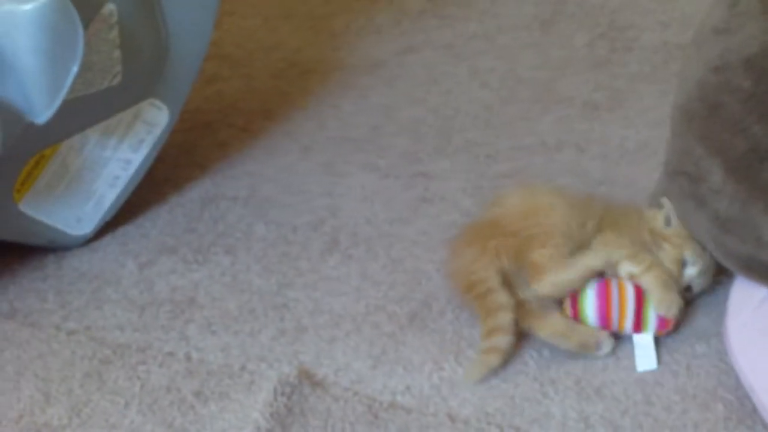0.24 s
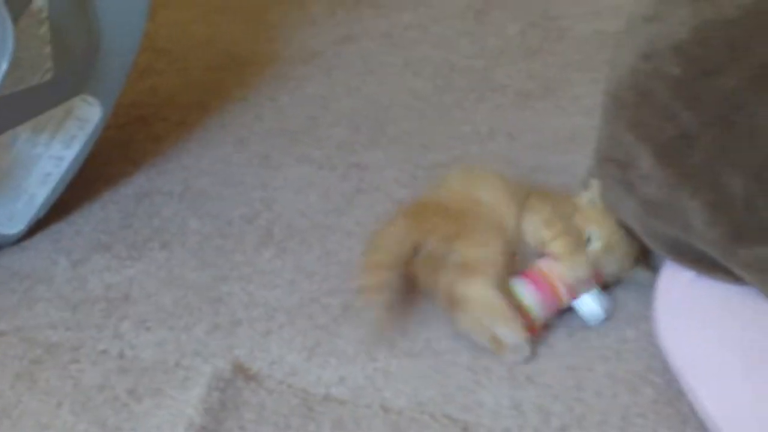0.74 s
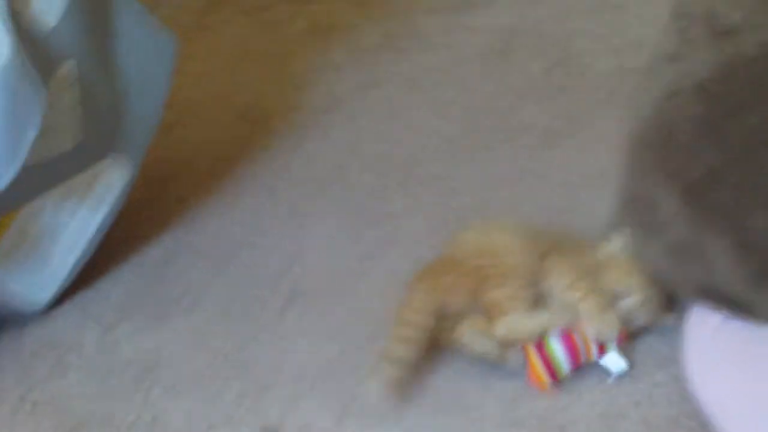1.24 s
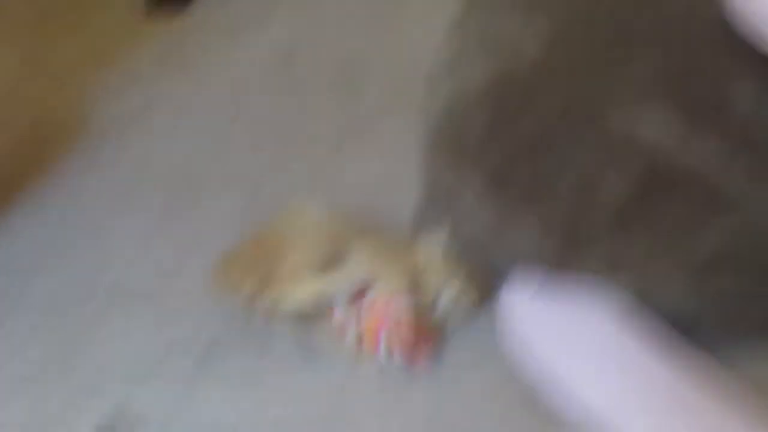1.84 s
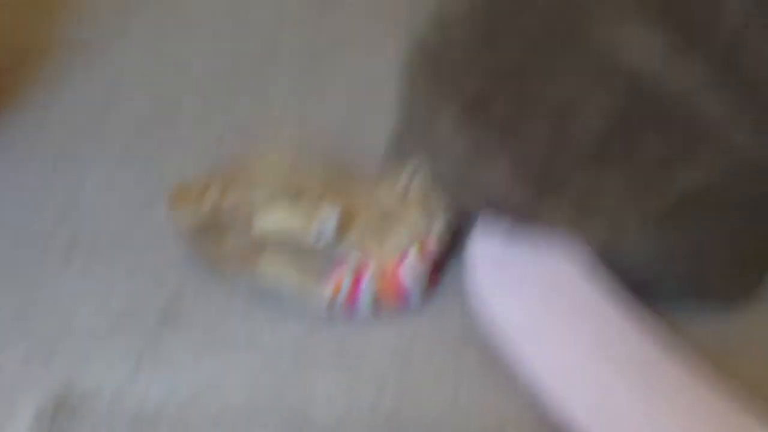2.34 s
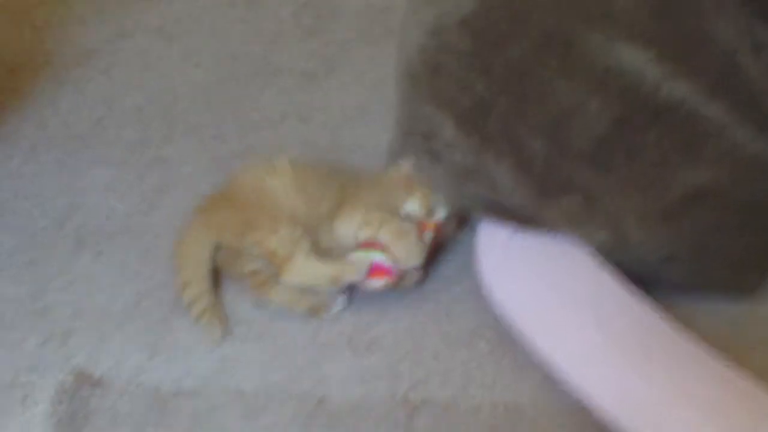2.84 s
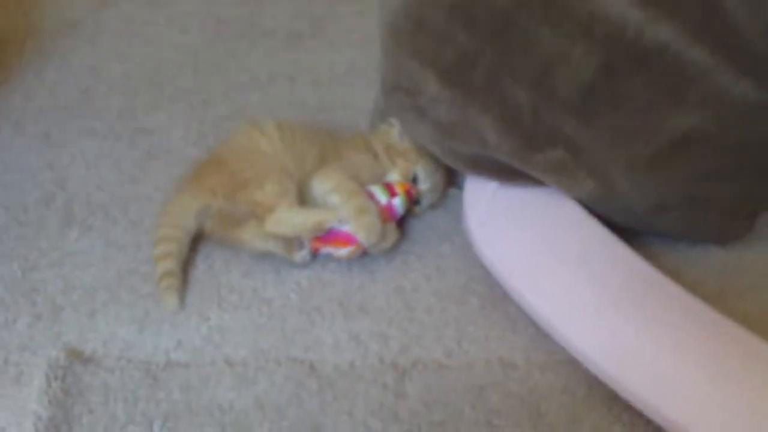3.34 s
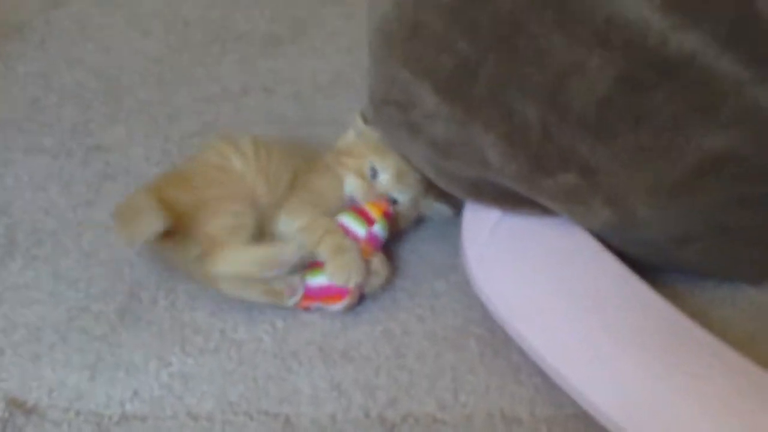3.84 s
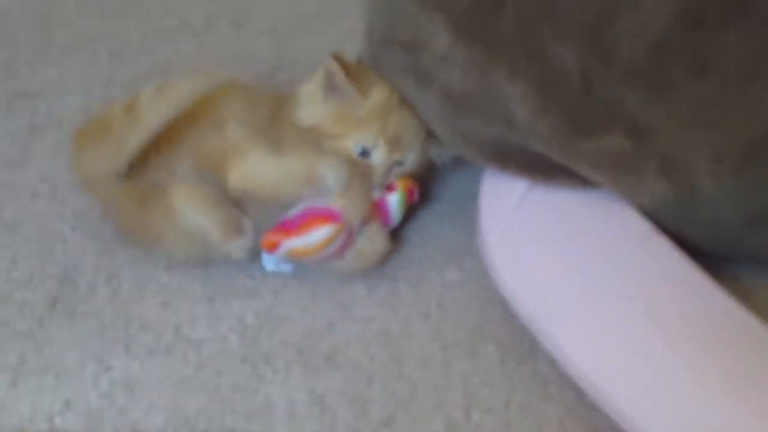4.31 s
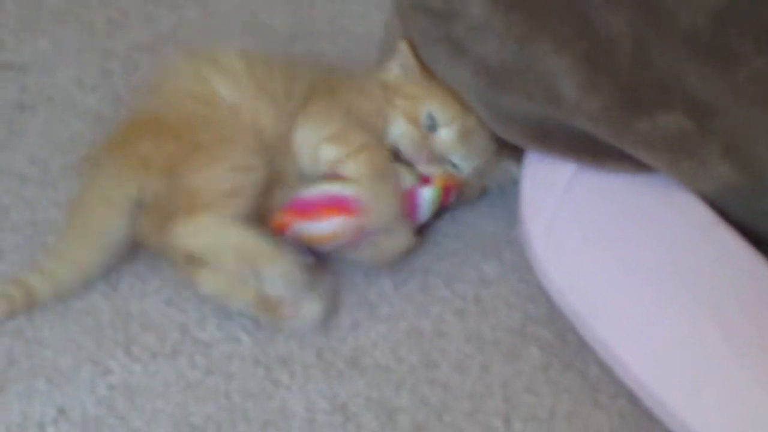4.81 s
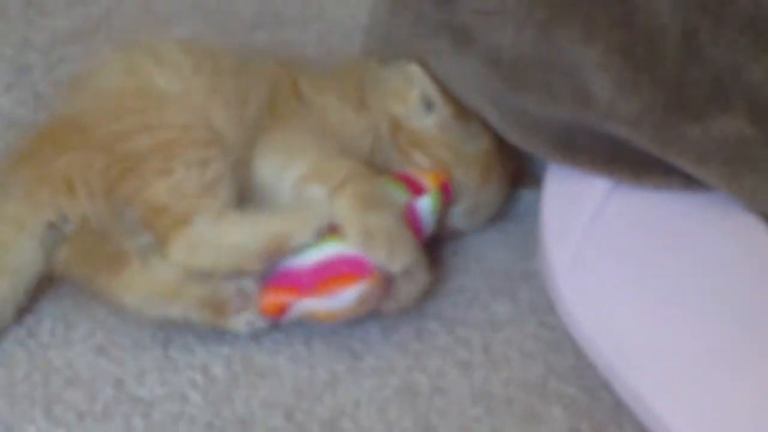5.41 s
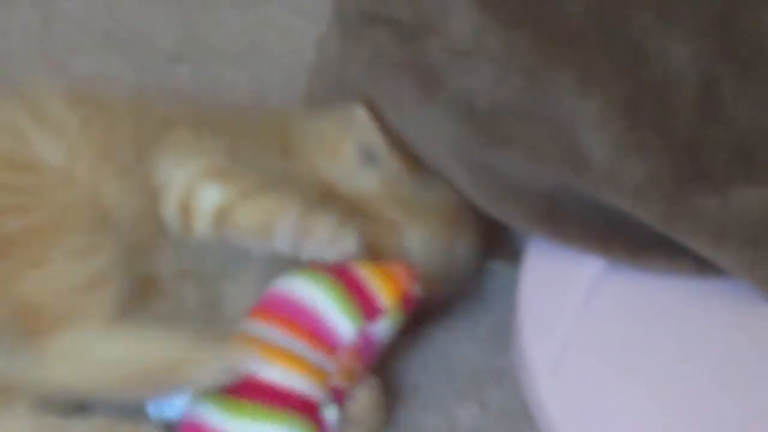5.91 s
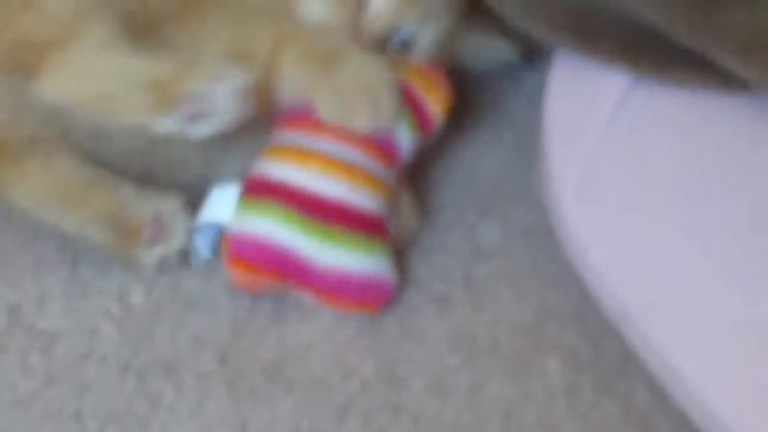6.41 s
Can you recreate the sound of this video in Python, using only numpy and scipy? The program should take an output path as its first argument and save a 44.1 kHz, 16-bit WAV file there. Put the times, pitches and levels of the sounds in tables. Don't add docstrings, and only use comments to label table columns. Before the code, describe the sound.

A kitten wrestles a cloth toy on carpet, but what is heard is the hand-held camera: steady soft hiss, hum and thin electronic whines, early ticks, then short dry finger rubs and creaks on plastic with one violent snap. Later come sparse taps, two bright hard snaps and a final duller double knock, all extremely close to the microphone in a quiet carpeted room.

```python
import sys
import numpy as np
from scipy import signal
from scipy.fft import rfft, irfft
from scipy.io import wavfile
from scipy.ndimage import uniform_filter1d

SR = 44100
rng = np.random.default_rng(int(sys.argv[2]) if len(sys.argv) > 2 else 0)


def gain_from_decibels(decibels):
    exponent = np.asarray(decibels, float) / 20
    return 10 ** exponent


def transcribe(u):
    v = np.clip(np.atleast_2d(u).T, -1, 1)
    q = np.round(v * 32767).astype(np.int16)
    wavfile.write(sys.argv[1], SR, q)


N = 293882


def evened(x):
    return x / np.sqrt(np.mean(x ** 2) + 1e-20)


def peaked(x):
    return x / (abs(x).max() + 1e-12)


def add(mix, start_s, sound):
    part = mix[round(start_s * SR):][:len(sound)]
    part += sound[:len(part)]


def band(x, hz, kind):
    return signal.sosfilt(signal.butter(3, hz, kind, fs=SR, output="sos"), x)


def resonate(x, hz, width_hz):
    return signal.lfilter(*signal.iirpeak(min(hz, .45 * SR), hz / width_hz, fs=SR), x)


def through(x, modes, shift_db=0):
    shift_db = shift_db + np.zeros((len(modes), 1))
    out = 0
    for k, (hz, width_hz, level_db) in enumerate(modes):
        out = out + (-1) ** k * gain_from_decibels(level_db + shift_db[k]) * resonate(x, hz, width_hz)
    return out


def wander(count, size):
    smooth = uniform_filter1d(rng.standard_normal(count), size)
    return evened(uniform_filter1d(smooth, size))


# pitch_hz, density_db (per Hz)
ROOM_SPECTRUM = [(30, -42.5), (100, -31), (150, -34), (229, -18), (291, -12), (388, -8.5), (533, -9),
                 (700, -4.5), (904, -8), (1310, -1.5), (2000, -8), (3480, -11.5), (8000, -15),
                 (15000, -18.5)]
# pitch_hz, width_hz, rise_db
HUMS = [(123, 25, 8), (240, 18, 5), (450, 33, 5), (629, 57, 3), (752, 24, 6.5), (960, 110, 7.5)]


def room():
    frames, hz = N // 512 + 5, np.fft.rfftfreq(2048, 1 / SR)
    real, imaginary, patches = rng.standard_normal((frames, 1025, 3)).T
    patches = uniform_filter1d(patches, size=5, axis=0)
    patches = evened(uniform_filter1d(patches, size=8, axis=1))
    knot_hz, knot_db = np.transpose(ROOM_SPECTRUM)
    colour_db = np.interp(np.log(hz + 1), np.log(knot_hz + 1), knot_db)
    for centre_hz, width_hz, rise_db in HUMS:
        colour_db += rise_db * np.exp(-((hz - centre_hz) / width_hz) ** 2)
    swell_db = .2 * wander(frames, size=20)
    spectra = (real + 1j * imaginary) * gain_from_decibels(colour_db[:, None] + 1.4 * patches + swell_db)
    noise = signal.istft(spectra, nperseg=2048, noverlap=1536)[1][:N]
    return gain_from_decibels(-55) * evened(noise)


# start_s, stop_s, pitch_hz, level_db, waver_hz
WHINES = [
    (0, 6.7, 7881, -83, 6),
    (3.5, 4.3, 11090, -77, 6),
    (4.7, 6.7, 11090, -81, 6),
    (5.2, 5.4, 15046, -68, 3),
]


def whines():
    t, out = np.arange(N) / SR, np.zeros(N)
    for start_s, stop_s, pitch_hz, level_db, waver_hz in WHINES:
        on = np.clip(np.minimum(t - start_s, stop_s - t) / .012, 0, 1)
        phase = 2 * np.pi * np.cumsum(pitch_hz + waver_hz * wander(N, size=2000)) / SR
        out += on * np.sqrt(2) * gain_from_decibels(level_db) * np.sin(phase)
    return out


# land_s, leave_s, first_db, last_db, pad_db (dullness of a flat finger pad)
STROKES = [(0.403, 0.404, -56, -49, -2), (1.212, 1.339, -47.5, -34, 4), (1.338, 1.353, -32.5, -33, 1),
           (1.372, 1.441, -59, -49.5, 6.5), (1.522, 1.578, -58, -52.5, 5), (1.694, 1.83, -49.5, -46.5, 3),
           (1.833, 1.968, -48.5, -51, 5), (1.952, 2.076, -43.5, -55, -6.5), (2.084, 2.183, -47, -39.5, 4),
           (2.188, 2.232, -37, -28.5, -2.5), (2.27, 2.347, -55, -47.5, -6), (2.401, 2.472, -52, -73, -2),
           (2.883, 2.937, -64, -57.5, 4), (2.952, 3.02, -54.5, -68, -5)]


def pressure(t):
    land_db_per_s, lift_db_per_s = 900, 897
    level = np.zeros((4, len(t)))
    for land_s, leave_s, first_db, last_db, pad_db in STROKES:
        progress = np.clip((t - land_s) / (leave_s - land_s), 0, 1)
        rise_db = (last_db - first_db) * progress ** 1.74
        db = first_db + rise_db
        db = db - land_db_per_s * np.maximum(land_s - t, 0) - lift_db_per_s * np.maximum(t - leave_s, 0)
        dull_db = pad_db - 0.12 * rise_db
        parts_db = [0 * t, dull_db, -1.5 + .3 * dull_db, -3.5 + .15 * rise_db]
        level = np.maximum(level, gain_from_decibels(np.maximum(db + parts_db, -200)))
    return level


# pitch_hz, width_hz, level_db
DULL = [(685, 210, -3.5), (1104, 290, 5.5), (1600, 160, 8.5), (2070, 94, 8.5)]
MIDDLE = [(2560, 190, -4.5), (3205, 300, -2), (4140, 470, -13.5)]
BRIGHT = [(4735, 310, 1), (5534, 370, 2.5), (6763, 560, 4), (8290, 1160, 0.5), (9250, 337, 0.5)]
TOP = [(10550, 2500, -3), (11960, 1100, -19), (13000, 1200, -11.5), (15400, 1400, -22.5)]


def strokes():
    grip_db = 0.62 * wander(N, size=40) + 0.94 * wander(N, size=300)
    catches_per_s = 500
    catches = gain_from_decibels(5.0 * np.minimum(rng.exponential(1, N), 3.6)) * (rng.random(N) < catches_per_s / SR)
    grains = rng.standard_normal(N) * (gain_from_decibels(grip_db) + 0.98 * catches)
    level = pressure(np.arange(N) / SR)
    parts = []
    for modes in (BRIGHT, DULL, MIDDLE, TOP):
        place_db = 2.4 * np.array([wander(N, size=1100) for _ in modes])
        parts.append(evened(through(grains, modes, place_db)))
    return band((level * parts).sum(axis=0), 340, "high")


# start_s, knock_db (peak), pitch_hz, bright_db (peak), slip_ms
CRACKS = [(0.3597, -23, 1600, -39, 2), (0.435, -28.5, 1270, -33, 1.3), (1.3348, -21.5, 1080, -28, 0.92),
          (1.4712, 1, 657, -4.5, 1.8), (1.8339, -19, 1300, -38, 4.3), (1.8375, -8, 848, -12, 1.9),
          (1.8454, -11.5, 1240, -39, 0.3), (2.2272, -24.5, 2060, -16, 2), (2.6781, -29, 1530, -47, 3.3),
          (2.6827, -22.5, 1620, -25.5, 2.3), (3.2215, -24, 1670, -20, 2.2), (3.3234, -13.5, 1130, 2.5, 1.1),
          (4.3317, -25, 720, -23, 1.2), (4.3355, -24.5, 1380, -39, 2), (4.5436, -11, 1890, 1, 1.27),
          (5.6346, -15, 1040, -19, 0.93), (5.6576, -5.5, 1645, -18.5, 1.04)]
# start_s, knock_db (peak), pitch_hz
CREAKS = [(1.2322, -27.5, 840), (1.3951, -30.5, 1560), (1.407, -35, 865), (1.4175, -28.5, 930),
          (1.5256, -42, 1150), (1.541, -37.5, 1150), (1.568, -38, 1340), (1.8263, -18, 840),
          (1.8623, -32, 1560), (1.8755, -25.5, 1810), (1.888, -33.5, 810), (1.8977, -30.5, 860),
          (2.0838, -50.5, 314), (2.2984, -26.5, 880), (2.317, -30, 1570), (2.4, -31, 1900),
          (2.4092, -32, 850), (2.431, -41, 1370)]
# start_s, knock_db (peak), pitch_hz, crack_db (relative to the knock)
TAPS = [(0.4101, -31, 1240, -4), (0.5244, -49.5, 450, 4), (0.5297, -31, 1230, -9), (0.9899, -49, 450, 0),
        (1.04, -38.5, 746, -10), (1.689, -38, 736, 0), (2.926, -39, 1730, 0), (2.9526, -25.5, 1110, -16),
        (3.1993, -32.5, 950, -5), (3.232, -31, 740, -28), (3.2508, -28, 1750, -22),
        (3.5709, -30, 1450, -20), (3.7025, -41, 1400, -6), (4.089, -26, 1800, -22),
        (5.7388, -41, 1330, 0.5), (5.8303, -27, 1920, -17)]


def joints():
    tick_ms = 1.62
    events = [*CRACKS]
    for start_s, knock_db, pitch_hz in CREAKS:
        events.append((start_s, knock_db, pitch_hz, -17.5 + 0.74 * knock_db, tick_ms))
    for start_s, knock_db, pitch_hz, crack_db in TAPS:
        events.append((start_s, knock_db, pitch_hz, knock_db + crack_db, tick_ms))
    rows = []
    for start_s, knock_db, pitch_hz, bright_db, slip_ms in sorted(events):
        from_knock_db = knock_db - 9.5 + 7.5 * np.log2(pitch_hz / 1600)
        middle_db = max(from_knock_db, bright_db - 7)
        rows.append((start_s, knock_db, pitch_hz, middle_db, bright_db, slip_ms))
    return rows


# pitch_hz, level_db, t60_s
RING = [(1158, -3.5, 0.039), (1303, 1.5, 0.024), (1750, 0, 0.028), (692, -10.5, 0.039), (2254, 2.5, 0.012),
        (2930, -12, 0.015), (5200, -38.5, 0.1), (6000, -22, 0.06), (6980, -2, 0.028), (6600, -26, 0.18),
        (10900, -87, 0.05)]


def snap(row, chance):
    start_s, knock_db, pitch_hz, middle_db, bright_db, slip_ms = row
    t = np.arange(len(chance)) / SR
    run = 1000 * t / max(slip_ms, .2)
    onset = np.clip(t / 0.000084, 0, 1)
    slips = chance * onset * (np.exp(-run ** 2) + gain_from_decibels(5) * np.exp(-run / 0.98))
    spectrum = rfft(slips)
    slips = irfft(spectrum / np.sqrt(uniform_filter1d(abs(spectrum) ** 2, size=60)))
    slips *= np.exp(-run / 3.2)

    blow = np.exp(-t / 0.00026) + 0.12 * peaked(slips)
    knock = peaked(resonate(blow, pitch_hz, pitch_hz / 6.1))
    body_share = np.clip((knock_db + 48) / 30, .3, 1.2) * min(pitch_hz / 1000, 1) ** 3
    shell = band(knock + body_share * peaked(through(slips, DULL)), 2300, "low")
    shell = gain_from_decibels(knock_db) * peaked(band(shell, min(0.49 * pitch_hz, 500), "high"))

    top_db = bright_db - 5.5 + 0.086 * (bright_db - knock_db)
    crack = 0
    for level_db, modes in ((middle_db, MIDDLE), (bright_db, BRIGHT), (top_db, TOP)):
        crack = crack + gain_from_decibels(level_db) * peaked(through(slips, modes))

    for k, (ring_hz, level_db, t60_s) in enumerate(RING):
        settling = np.roll(chance, -300 * k) * np.exp(-t / 0.0037)
        drive_db = bright_db - 26
        if ring_hz < 2500:
            drive_db = max(drive_db, knock_db - 21.5 + 14 * np.log2(min(pitch_hz / 1100, 1)))
        ring = resonate(settling, ring_hz, np.log(1000) / np.pi / t60_s)
        shell += gain_from_decibels(drive_db + level_db) * peaked(resonate(ring, ring_hz, 430))

    push = gain_from_decibels(0.67 * bright_db + .5 * knock_db - 29) * np.sin(np.pi * np.clip(t / 0.0014, 0, 1)) ** 2
    return start_s - .0003, shell + push + band(crack, 1100, "high")


def gate_treble(x):
    edge_hz = 15400
    hz, _, z = signal.stft(x, SR, nperseg=1024)
    groups = uniform_filter1d(abs(z) ** 2, size=5, axis=0)
    share = np.clip((hz - 8500) / 6000, 0, 1)[:, None] * 0.82
    weak = groups < share * uniform_filter1d(groups, size=40, axis=0)
    z[weak | (hz > edge_hz)[:, None]] = 0
    return signal.istft(z, SR, nperseg=1024)[1][:N]


def scene():
    quiet, loud = room() + whines() + strokes(), np.zeros(N)
    rows = joints()
    for row, chance in zip(rows, rng.standard_normal((len(rows), 4400))):
        bright_db, slip_ms = row[4:]
        add(loud if bright_db > -25 and slip_ms < 3.2 else quiet, *snap(row, chance))
    return (gate_treble(quiet) + band(loud, 14000, "low"))[None]


def roll_off(x):
    return signal.sosfilt(signal.butter(12, 17010, fs=SR, output="sos"), x)


def record(dry):
    power_db = 10 * np.log10(abs(uniform_filter1d(dry[0] ** 2, size=120)) + 1e-12)
    fall_db = np.arange(N) * 140.0 / SR
    over_db = np.maximum(np.maximum.accumulate(power_db + fall_db) - fall_db + 13.5, 0)
    late_db = uniform_filter1d(over_db, size=200, origin=99)
    ducked = dry / gain_from_decibels(0.74 * late_db)
    excess = ducked - np.clip(ducked, -.66, .66)
    flattened = ducked - band(excess, 350, "high")
    edge = signal.firwin(255, 16500, window=("kaiser", 9), fs=SR)
    return roll_off(signal.oaconvolve(flattened, edge[None], "same"))


dry = scene()
out = record(dry)
transcribe(out)
```